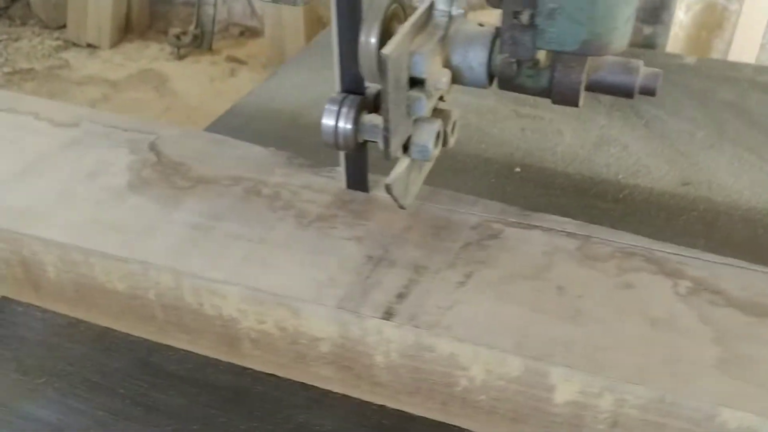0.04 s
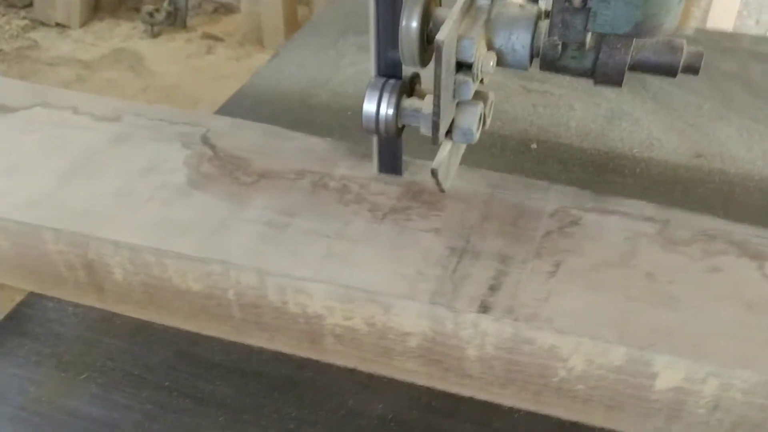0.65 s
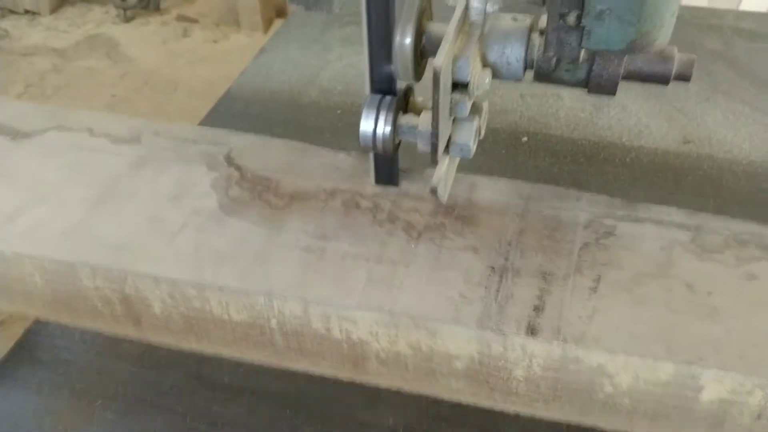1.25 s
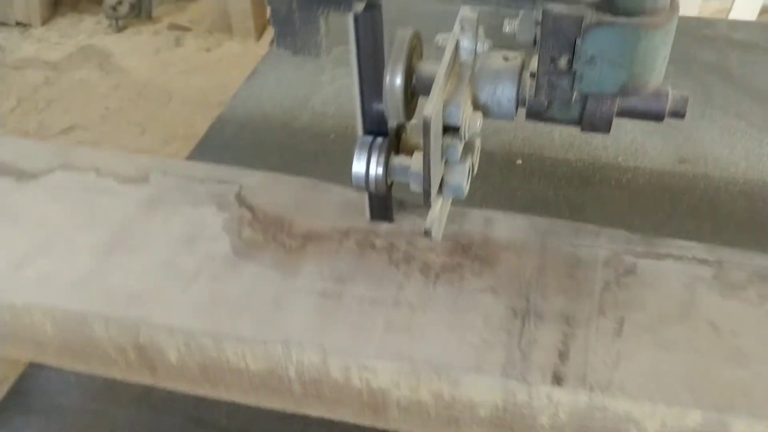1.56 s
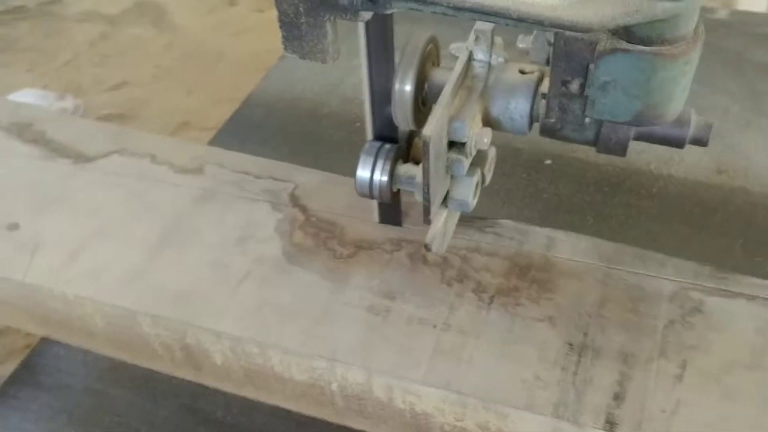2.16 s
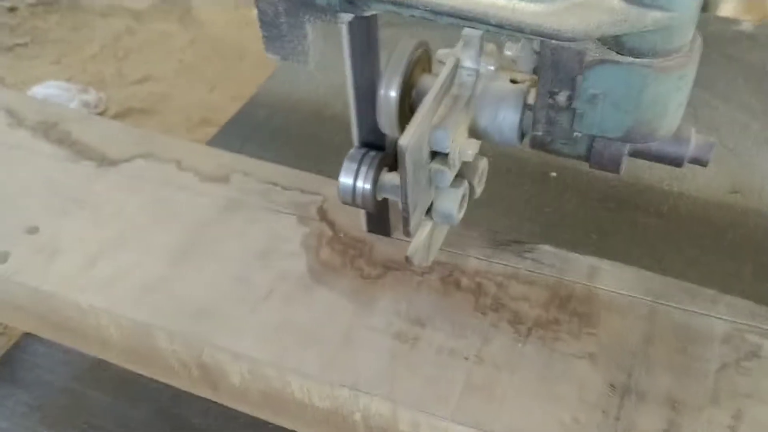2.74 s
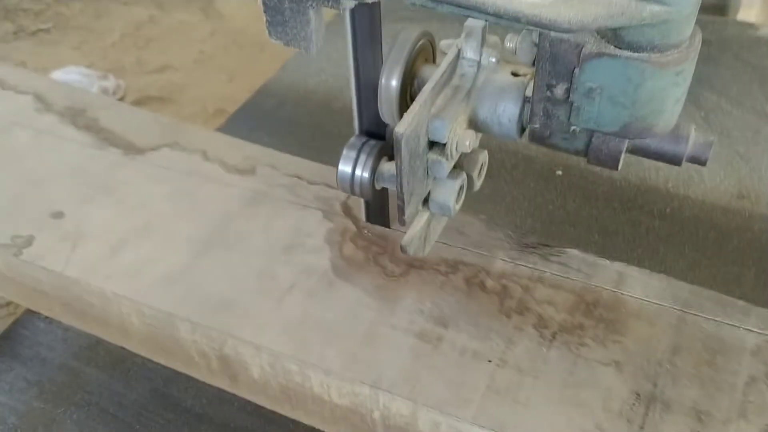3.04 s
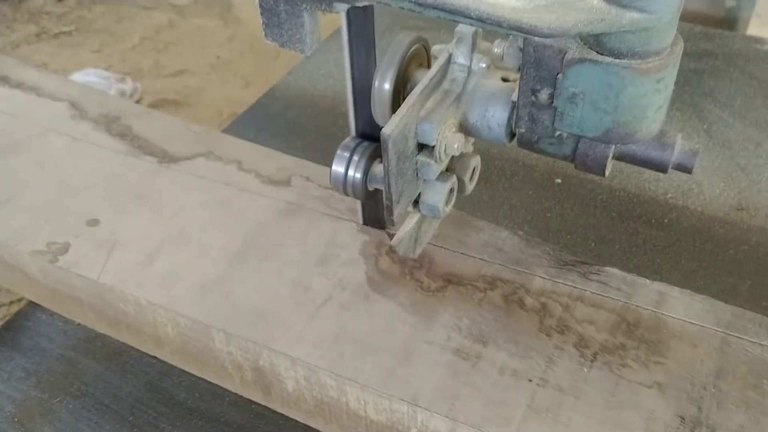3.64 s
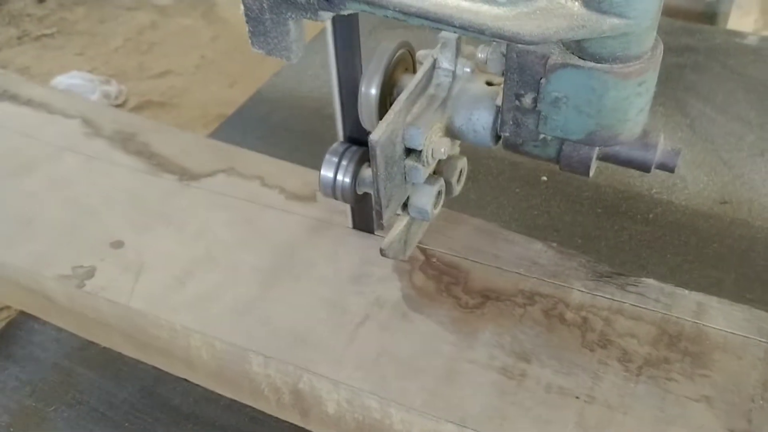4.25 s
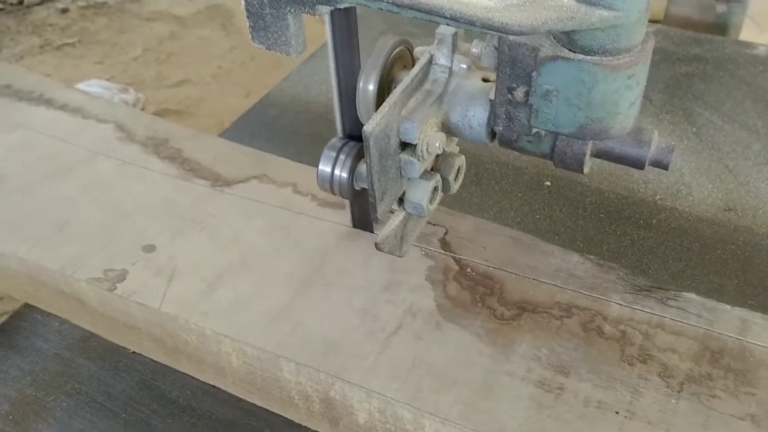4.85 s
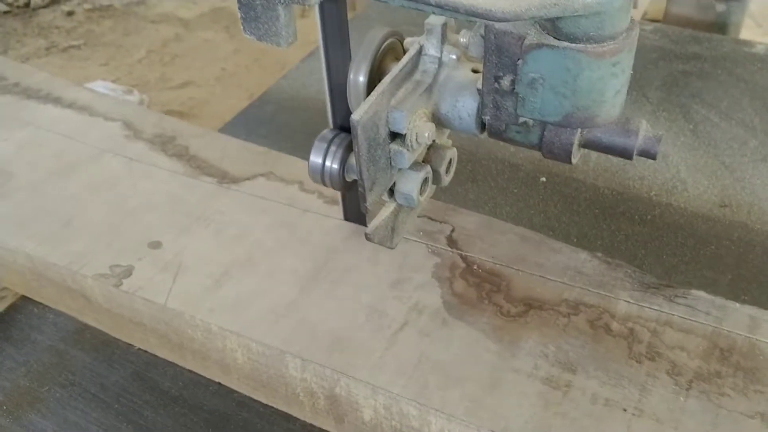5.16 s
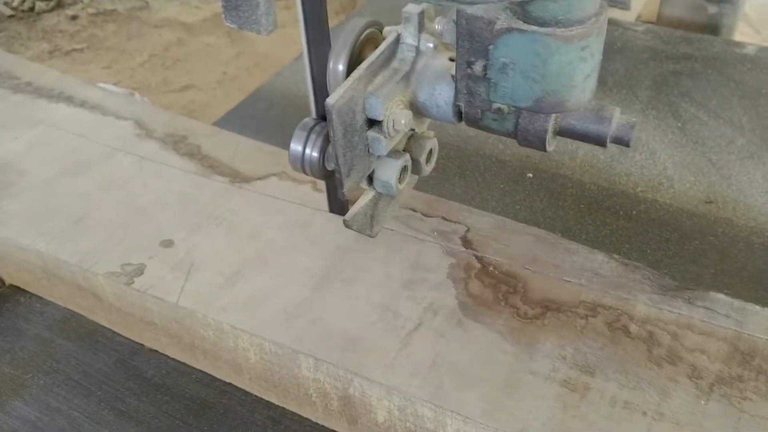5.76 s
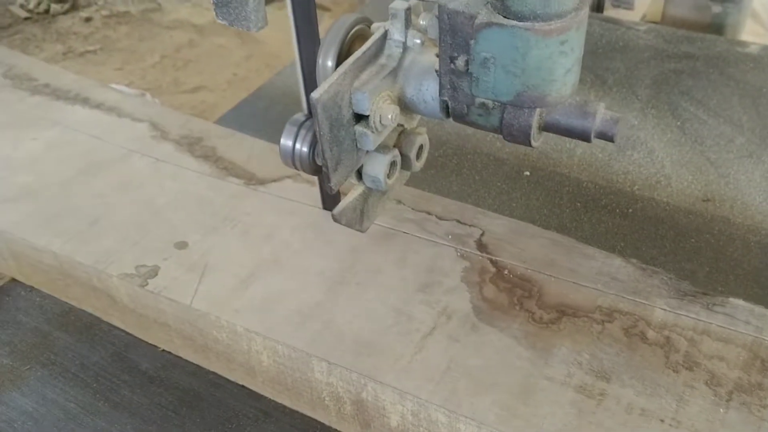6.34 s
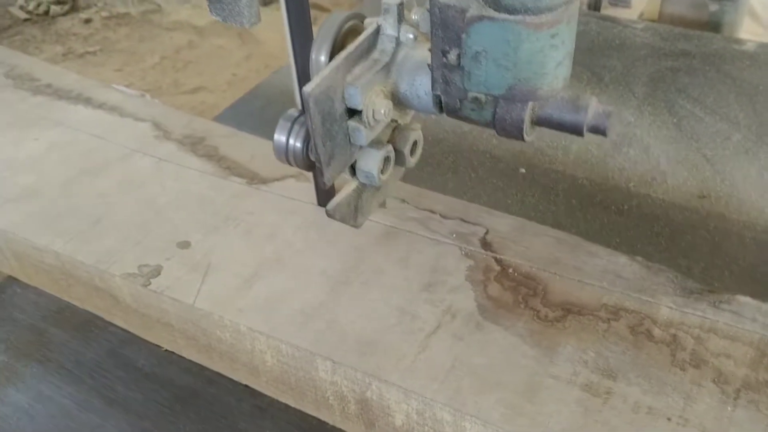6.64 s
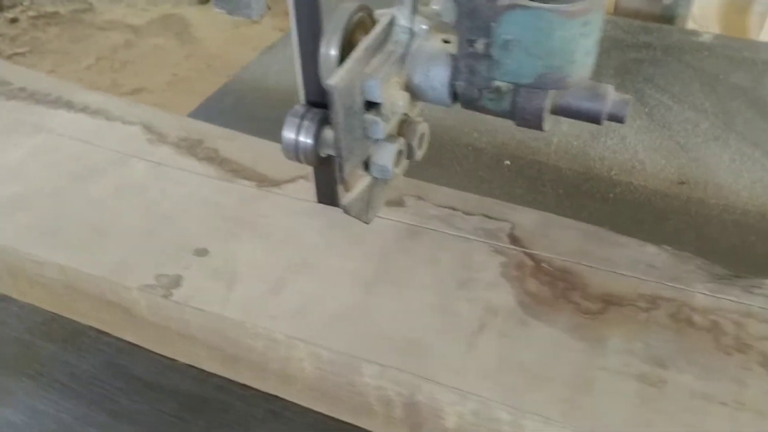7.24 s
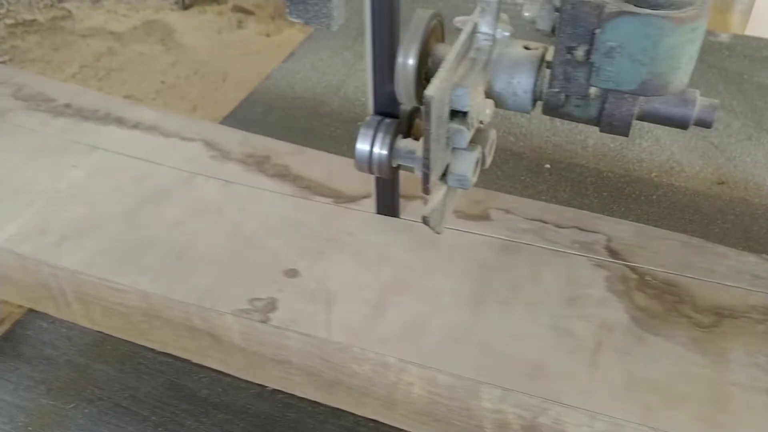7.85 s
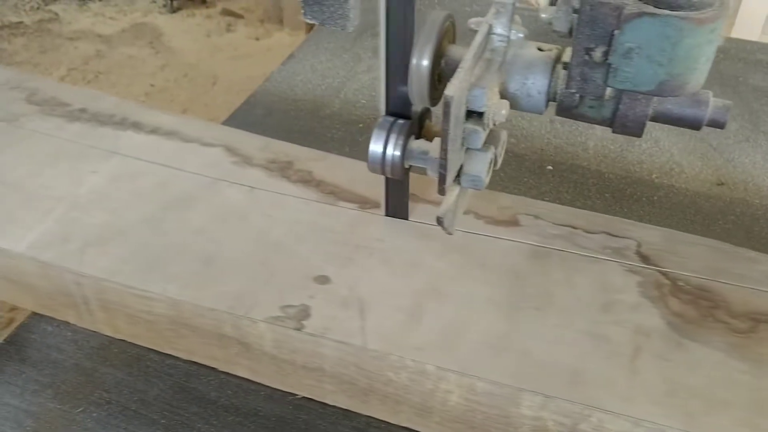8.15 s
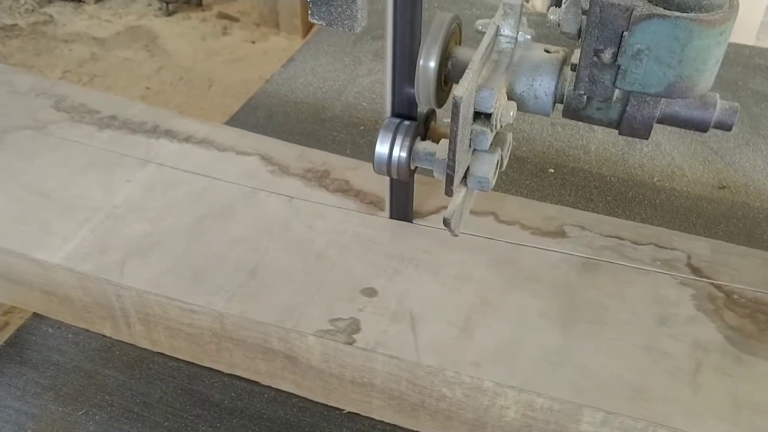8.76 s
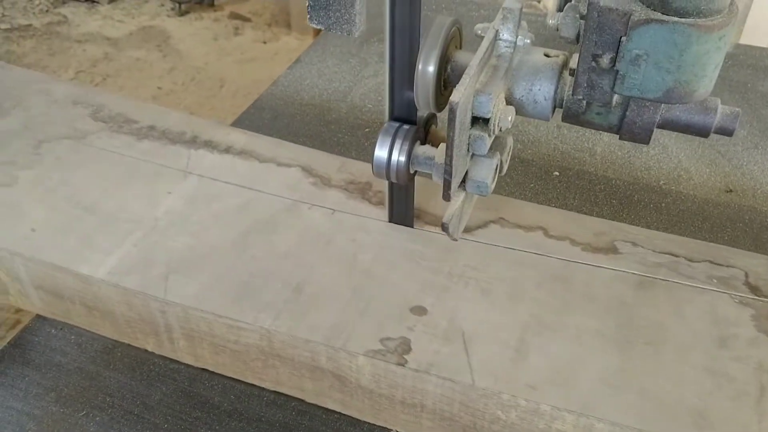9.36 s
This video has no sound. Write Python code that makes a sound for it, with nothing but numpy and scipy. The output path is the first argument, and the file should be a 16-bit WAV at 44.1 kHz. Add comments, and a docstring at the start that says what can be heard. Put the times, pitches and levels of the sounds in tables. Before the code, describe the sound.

A large band saw rips a thick plank with a steady rasp and high metallic ringing, while air buffets the microphone.

```python
"""A large band saw rips a thick plank, heard from beside the blade guide.
The teeth tear the wood in a dense rasp and the steel band sings in drifting treble zones.
Underneath, air dragged along by the wheels buffets the microphone, mostly on the left;
its strongest gusts make the limiter duck."""
import sys
import numpy as np
from scipy import signal
from scipy.fft import rfft, irfft
from scipy.io import wavfile
from scipy.ndimage import uniform_filter1d, minimum_filter1d

SR = 44100
rng = np.random.default_rng(int(sys.argv[2]) if len(sys.argv) > 2 else 0)


def bounce(signal):
    """Save signal as a 16-bit WAV file at the path given by the first command-line argument."""
    frames = np.transpose(np.atleast_2d(signal))
    limited = np.clip(frames, -1, 1)
    pcm = np.round(limited * 32767).astype(np.int16)
    wavfile.write(sys.argv[1], SR, pcm)


N = 418950
CEILING_DB = 6  # the limiter ducks above this level


def gain_of(db):
    """Decibels to amplitude."""
    return 10 ** (np.asarray(db) / 20)


def read(points, hz):
    """A spectrum table joined by straight lines on a log-frequency axis."""
    points_hz, values = np.transpose(points)
    return np.interp(np.log(hz + 1), np.log(points_hz), values)


def follow(rows, t):
    """Every column of an automation table at the times t."""
    times_s, *columns = np.transpose(rows)
    return [np.interp(t, times_s, column) for column in columns]


def white():
    """Unrelated noise left and right, 0 dB per Hz."""
    return rng.standard_normal((2, N)) * np.sqrt(SR / 2)


def colour(x, gain):
    """Filters x by a gain that is a function of frequency."""
    return irfft(rfft(x) * gain(np.fft.rfftfreq(N, 1 / SR)), N)


def flutter(rate_hz):
    """Random wavering of spread 1 that rolls off above rate_hz."""
    x = colour(rng.standard_normal(N), lambda hz: hz / (hz + 3) / (1 + (hz / rate_hz) ** 2))
    return x / x.std()


def stream(t, waver_db=0.26, waver_hz=5, swing_half_s=0.025):
    """Strength of the wheels' draught in dB: nearly steady, with short surges and lulls."""
    # slow trend of the draught: time_s, level_db
    trend = [(0, -1), (0.75, 0), (1.2, 1), (1.55, 3), (2.0, 1), (3.1, 1), (4.3, 1.2), (5.2, 0.5),
             (6.0, 0.1), (7.5, -0.5), (8.0, 0.3), (8.9, 0.2), (9.5, 1.4)]
    # the air swings briefly onto or off the microphone: time_s, change_db
    swings = [(0.25, -5), (1.06, -8), (1.2, -2), (1.351, -3), (1.87, -2.5), (2.3, 2), (2.45, 2), (3.0, 2.5),
              (3.25, 2), (4.1, 1.2), (4.88, -1.5), (5.07, -1), (5.46, -4.5), (5.72, 2.5), (6.08, -1),
              (6.36, -6), (6.5, 3), (6.6, -5), (6.84, -1), (7.33, -3), (7.44, 4), (7.66, -1.5),
              (8.05, -1.5), (8.37, -2.5), (8.86, 1.5), (9.02, 0), (9.35, 2.5)]
    swings_db = sum(db * np.exp(-.5 * ((t - s) / swing_half_s) ** 2) for s, db in swings)
    return follow(trend, t)[0] + waver_db * flutter(waver_hz) + swings_db


def draught(t, stream_db, rumble_follows=0.16, eddy_db=4.0, eddy_hz=100, split_hz=280):
    """Air on the microphone: a bed of rumble, and a burst of finer turbulence from each eddy."""
    # turbulence on the windward left side: freq_hz, level_db
    windward = [(25, -31), (45, -48.5), (65, -49), (100, -43.5), (160, -40.5), (250, -44), (400, -48.5),
                (700, -53.5), (1200, -61), (2000, -65.5), (4000, -115.5)]
    # how much weaker it is on the sheltered right: freq_hz, gain_db
    shelter = [(150, -13), (400, -12), (1200, -8.5)]
    # ride on the low rumble: time_s, gain_db
    rumble_ride = [(0, 0.7), (0.72, 2.5), (0.87, -1.5), (1.12, 3), (1.3, -0.6), (2.1, 0.2), (2.95, -2),
                   (3.3, 0), (5.1, 0.5), (5.35, 1.5), (6.25, -0.8), (6.6, 0.8), (7.5, 1), (7.85, 1.8),
                   (8.65, 1), (9.3, 1.5), (9.5, -2)]
    air = colour(white(), lambda hz: gain_of([read(windward, hz), read(windward, hz) + read(shelter, hz)]))
    rumble = colour(air, lambda hz: 1 / (1 + (hz / split_hz) ** 4))
    rumble_db = follow(rumble_ride, t)[0] + rumble_follows * stream_db
    eddies = gain_of(eddy_db * np.tanh(flutter(eddy_hz)))  # soft cap: rough, but free of knocks
    buffet = (air - rumble) * eddies / np.sqrt(np.mean(eddies ** 2))
    return gain_of(rumble_db) * rumble + gain_of(stream_db) * buffet


def gusts(t, width_s=0.018, trim_db=4.5):
    """Swells of pressure on the left, too slow to hear, that lean on the limiter."""
    # pushes of air: time_s, peak_db (against the ceiling, before trim_db)
    pushes = [(0.125, -4.5), (1.13, -5), (1.335, -4.5), (1.585, -2.5), (2.16, -3), (5.37, -1.3),
              (6.29, -4.7), (6.8, -3.4), (7.705, -5), (8.96, -2.8)]
    pressure = sum(gain_of(CEILING_DB + trim_db + db) * np.exp(-.5 * ((t - s) / width_s) ** 2)
                   for s, db in pushes)
    return np.array([pressure, np.zeros(N)])


def sizzle(t, start_s, end_s, rise_s=0.28, fall_s=0.13):
    """Envelope in dB of one sizzle of the band: it swells before start_s and dies away after end_s."""
    time_constants = np.maximum(start_s - t, 0) / rise_s + np.maximum(t - end_s, 0) / fall_s
    return -20 * np.log10(np.e) * time_constants


def blade(level_db=-1.0, right_db=-17, mode_width_hz=26, wander_hz=9, size=2048):
    """Crowded modes of the steel band sing; the main zone drifts with the cut, others come and go."""
    # main zone of resonances: time_s, crest_hz, level_db
    singing = [(0, 8100, -59.5), (0.5, 8000, -56.5), (1.25, 7900, -57.5), (1.85, 8550, -58.8),
               (2.3, 8600, -58), (2.8, 8460, -57.5), (3.4, 8300, -59.5), (4.5, 8250, -58),
               (5.2, 8400, -58.3), (6.7, 8350, -59), (7.5, 8360, -59), (8.7, 8800, -56), (9.5, 8360, -56.5)]
    # zones that sizzle or, if narrow, whistle: start_s, end_s, centre_hz, width_hz, left_db, right_db
    sizzles = [(0, 1.55, 10950, 600, -60, -81), (0, 0.45, 10200, 550, -63, -66),
               (0.45, 0.97, 8100, 110, -59, -62), (1.35, 1.6, 9900, 450, -59, -70),
               (2.55, 5.2, 9300, 480, -61, -72), (5.7, 6.15, 10450, 550, -63, -63),
               (6.5, 7.1, 10060, 500, -61, -63.5), (7.3, 7.65, 10450, 500, -63.5, -63),
               (7.35, 7.1, 8620, 130, -51, -66), (7.8, 9.5, 11900, 1100, -71, -80)]
    # the clearest modes: pitch_hz, level_db (against the crowd)
    clear_modes = [(7050, 0), (7290, -7), (7510, 4), (7660, -8), (7815, 6), (8170, -11), (8280, -11),
                   (8410, -11), (8560, -9), (8710, -9), (8990, -5), (9255, 4), (9540, -4), (9830, -4)]
    hz, t, spectrum = signal.stft(white(), SR, nperseg=size)

    def bell(centre_hz, width_hz, db=0):
        """The power of one mode or cluster of modes."""
        return gain_of(db) ** 2 * np.exp(-((hz[:, None] - centre_hz) / width_hz) ** 2)

    crest_hz, zone_db = follow(singing, t)
    crest = bell(crest_hz, width_hz=720)
    shoulder = bell(centre_hz=7300, width_hz=700, db=-7)
    skirt = bell(centre_hz=9800, width_hz=2100, db=-8)
    main_zone = (crest + shoulder + skirt) * gain_of([zone_db, zone_db + right_db])[:, None] ** 2
    passing_zones = sum(
        np.array([bell(centre_hz, width_hz, db + sizzle(t, start_s, end_s)) for db in sides_db])
        for start_s, end_s, centre_hz, width_hz, *sides_db in sizzles)
    # the clear modes wander together as the band's tension varies
    shift_hz = wander_hz * np.interp(t, np.arange(N) / SR, flutter(rate_hz=1.5))
    peaks = 1 + sum(bell(pitch_hz + shift_hz, mode_width_hz, db) for pitch_hz, db in clear_modes)
    spectrum = spectrum * np.sqrt((main_zone + passing_zones) * peaks)
    return gain_of(level_db) * signal.istft(spectrum, SR, nperseg=size)[1][:, :N]


def shimmer(x, depth_db=2.0, from_hz=6000, size=1024, patch_frames=60, patch_bins=4):
    """Narrow patches of the treble swell and fade over a third of a second."""
    framing = dict(nperseg=size, noverlap=size - size // 4)
    hz, _, spectrum = signal.stft(x, SR, **framing)
    patches = uniform_filter1d(rng.standard_normal(spectrum.shape), patch_frames, axis=2)
    patches = uniform_filter1d(patches, patch_bins, axis=1)
    spread_db = depth_db * (hz ** 2 / (hz ** 2 + from_hz ** 2))[:, None]
    spectrum = spectrum * gain_of(spread_db * patches / patches.std())
    return signal.istft(spectrum, SR, **framing)[1][:, :N]


def bite(t, uneven_db=0.76, uneven_hz=8):
    """Bite of the teeth in dB: the feed pressure, a little uneven."""
    # how hard the plank is fed: time_s, level_db
    feed = [(0, -1.5), (0.6, -0.9), (1.3, -1.5), (1.65, -1.5), (2.0, 0.5), (2.3, -1.4), (3.4, -1),
            (4.7, -0.8), (5.3, -1.5), (5.68, -0.9), (6.2, -1.5), (7.1, -0.7), (7.55, -0.7), (8.0, -1.4),
            (8.8, -1.2), (9.5, -1.4)]
    return follow(feed, t)[0] + uneven_db * flutter(uneven_hz)


def rasp(bite_db, grain_db=0.6, grain_hz=40):
    """Countless fibres snap under the teeth and merge into a hiss, roughened by the wood's grain."""
    # hiss of the cut: freq_hz, level_db
    hiss_eq = [(100, -75), (400, -61), (1000, -60.5), (1700, -65), (2150, -67.5), (2700, -64), (3200, -67),
               (3800, -69.3), (4450, -67.5), (4900, -82), (5500, -69), (6200, -71), (7000, -63),
               (9800, -67), (11900, -67.5), (13000, -68.5), (13800, -68), (15300, -67)]
    # treble shading on the right: freq_hz, gain_db
    shade = [(6000, 0), (9000, -6), (12500, -1.5), (15300, -2)]
    level_db = bite_db + grain_db * flutter(grain_hz)
    hiss = colour(white(), lambda hz: gain_of([read(hiss_eq, hz), read(hiss_eq, hz) + read(shade, hz)]))
    return gain_of(level_db) * hiss


def scene(blade_follows=0.18):
    """The bite drives the rasp and, more gently, the band; the wheels' air blows beneath them."""
    t = np.arange(N) / SR
    bite_db, stream_db = bite(t), stream(t)
    cut = rasp(bite_db) + gain_of(blade_follows * bite_db) * blade()
    return shimmer(cut) + draught(t, stream_db) + gusts(t)


def limit(x, hold_s=0.032, release_s=0.054, attack_s=0.0071):
    """A peak limiter: it ducks fast, holds, then recovers."""
    peak_db = 20 * np.log10(abs(x).max(0) + 1e-9)
    over_db = np.maximum(peak_db - CEILING_DB, 1e-9)
    hold = round(hold_s * SR)
    held_db = -minimum_filter1d(-over_db, hold, origin=(hold - 1) // 2)
    fade = np.arange(N) / SR / release_s
    duck_db = np.exp(np.maximum.accumulate(np.log(held_db) + fade) - fade)  # exponential release
    return x * gain_of(-uniform_filter1d(duck_db, round(attack_s * SR)))


def widen(x):
    """Stereo widening: a delayed share of each side is taken away from the other."""
    # crossfeed amount: freq_hz, share (0-1)
    shares = [(100, .56), (1200, .62), (2000, .82), (2300, .97), (2500, .99), (3000, .88), (3600, .94),
              (4900, 1), (5500, .88), (6100, .66), (6600, .3), (15000, .33)]
    # crossfeed lag: freq_hz, delay_s
    delays = [(100, .000422), (1300, .000422), (2250, .000418), (2600, .000403), (3000, .000412),
              (3600, .000414), (4300, .000412), (4750, .000415), (5100, .000398), (5500, .000406),
              (6600, .00042), (15000, .000422)]
    return x - colour(x[::-1], lambda hz: read(shares, hz) * np.exp(-2j * np.pi * hz * read(delays, hz)))


def record(dry, low_cut_hz=60, high_cut_hz=15500):
    """Limiter, wind filter, stereo widening and a steep high cut."""
    wind_filter = signal.butter(N=5, Wn=low_cut_hz, btype="high", fs=SR, output="sos")
    high_cut = signal.firwin(1023, high_cut_hz, window=("kaiser", 9), fs=SR)
    wide = widen(signal.sosfilt(wind_filter, limit(dry)))
    return signal.oaconvolve(wide, high_cut[None], "same")


dry = scene()
out = record(dry)
bounce(out)
```